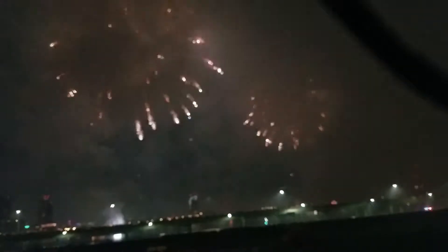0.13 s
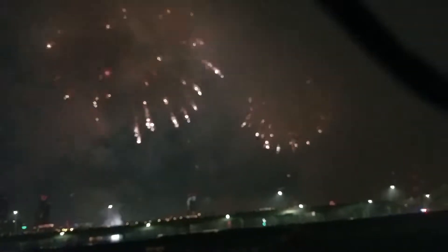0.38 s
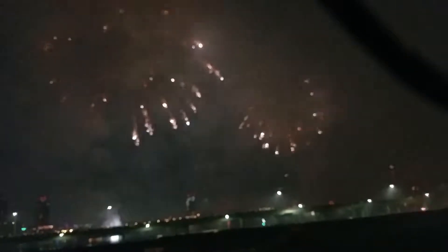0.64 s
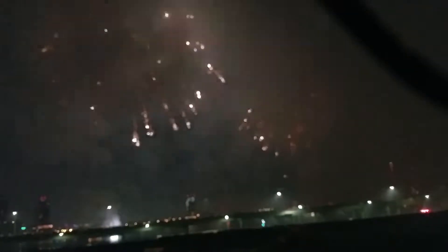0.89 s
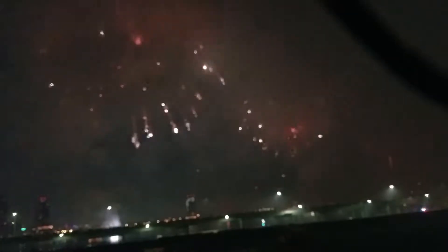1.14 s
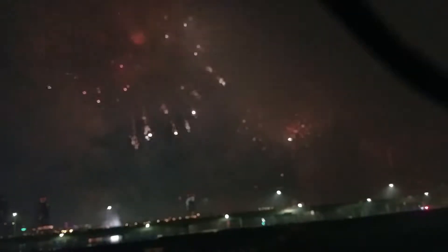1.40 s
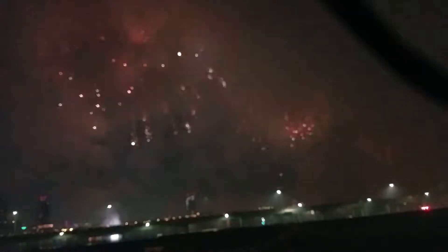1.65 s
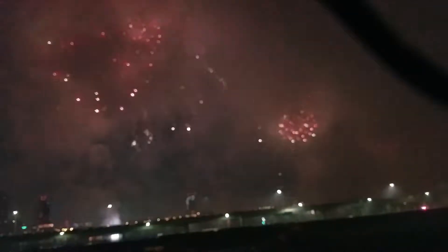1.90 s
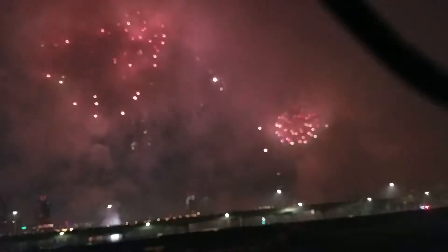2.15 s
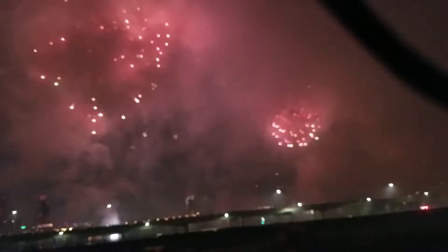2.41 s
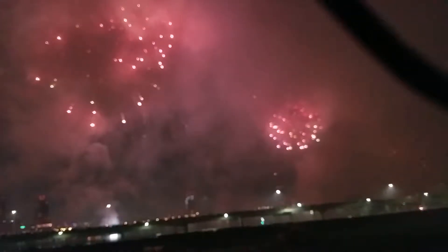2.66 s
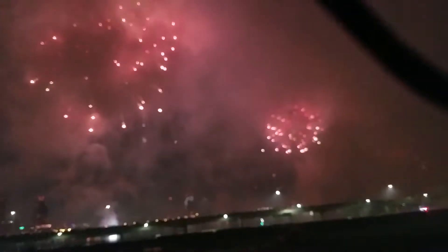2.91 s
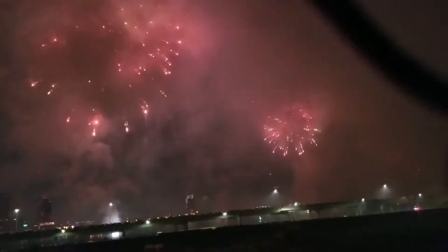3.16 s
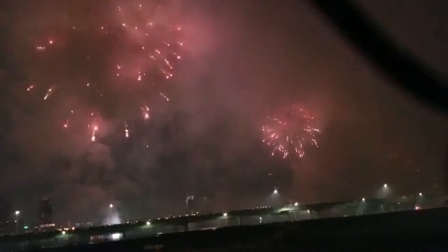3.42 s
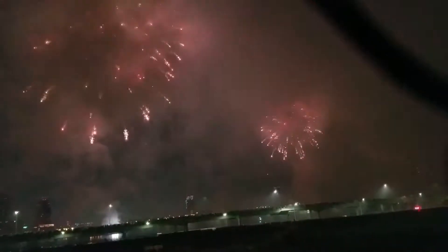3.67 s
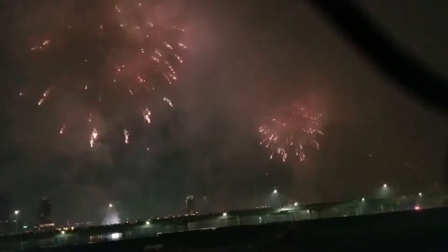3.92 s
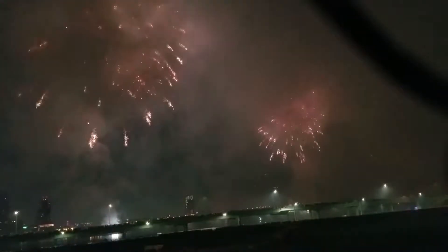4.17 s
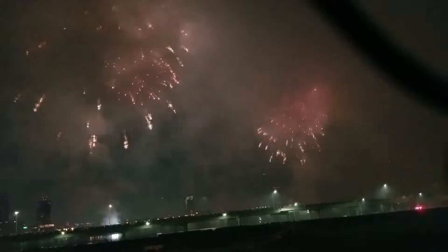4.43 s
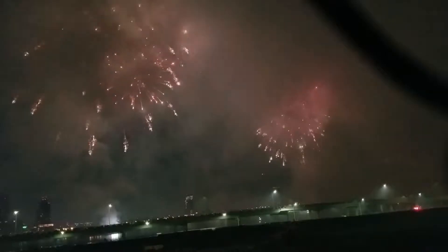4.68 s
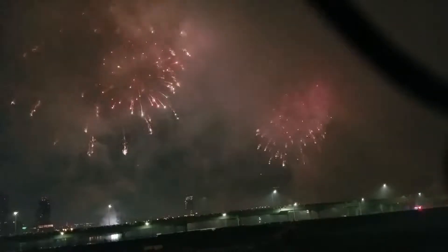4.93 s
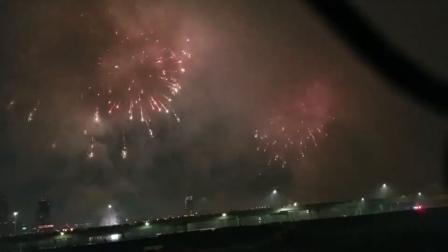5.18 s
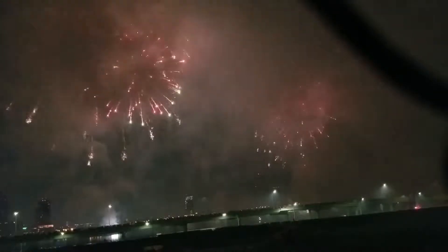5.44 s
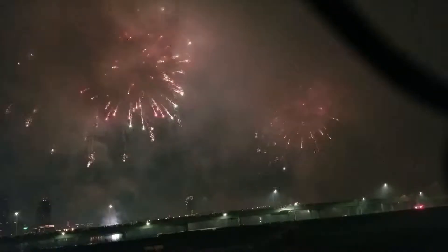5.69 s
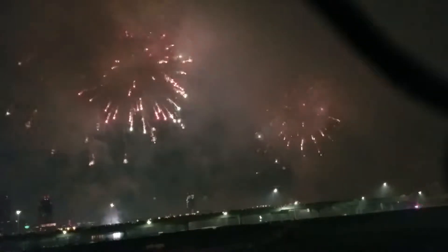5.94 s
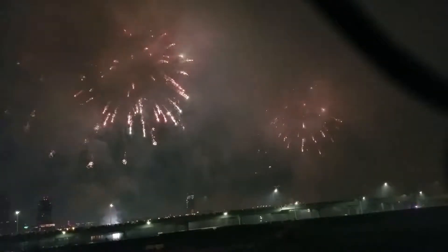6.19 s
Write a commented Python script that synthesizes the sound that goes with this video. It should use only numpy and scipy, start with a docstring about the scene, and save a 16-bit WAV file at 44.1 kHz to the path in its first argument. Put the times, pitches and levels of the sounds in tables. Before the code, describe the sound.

Aerial shells burst in an outdoor display, heard at a distance on a small handheld stereo microphone. Thumping reports with short bright cracks and rolling shore echoes come in irregular clusters, strongest near two, three and a half and five seconds. Between them, fizzing clouds of crackling stars rise and die over a wandering bass rumble and faint night noise; hard little clicks and rattles strike close to the microphone.

```python
"""Fireworks far off over water at night: crackling clouds of stars swell and fade over a lurching rumble.
Stars and rumble are countless small random bursts, coloured and spread over several bearings.
Each loud report is a blast wave, its mirror off the water, a bright crack and scattered shore echoes.
Sharp ticks and rattles ring two small microphone ports, mostly the left; slow thuds deepen the blasts."""
import sys
import numpy as np
from scipy import signal
from scipy.fft import rfft, irfft
from scipy.io import wavfile
from scipy.ndimage import uniform_filter1d

SR = 44100
rng = np.random.default_rng(int(sys.argv[2]) if len(sys.argv) > 2 else 0)


def digitize_waveform(pressure):
    """Quantize a signal to 16-bit integers and store it at the path in sys.argv[1].

    Rows of a 2-D input are taken as channels; values are limited to [-1, 1].
    """
    field = np.atleast_2d(pressure).T
    bounded = np.clip(field, -1, 1)
    quanta = np.round(bounded * 32767).astype(np.int16)
    wavfile.write(sys.argv[1], SR, quanta)


def voltage_ratio(level):
    """Linear amplitude factor for a level in decibels (scalar or array-like)."""
    return 10 ** (np.asarray(level, float) / 20)


N = 278712  # length of the scene in samples


def evened(x):
    """Scales to an rms (average strength) of 1."""
    return x / np.sqrt(np.mean(x ** 2) + 1e-20)


def read(points, hz):
    """Reads a table of (f/Hz, value) along log frequency."""
    f, value = np.transpose(points)
    return np.interp(np.log(hz + 1), np.log(f + 1), value)


def add(mix, s, sound):
    """Mixes a sound in at s seconds, cut off where the scene ends."""
    part = mix[:, round(s * SR):][:, :sound.shape[1]]
    part += sound[:, :part.shape[1]]


def coloured(x, points):
    """Filters with the given spectrum, with no sound ahead of its cause (minimum phase)."""
    log_gain = np.log(voltage_ratio(read(points, abs(np.fft.fftfreq(8192, 1 / SR)))))
    taps = np.fft.ifft(np.exp(np.conj(signal.hilbert(log_gain)))).real[:4096]
    return signal.oaconvolve(x, taps[None], axes=1)[:, :x.shape[1]]


def scattered(pair):
    """Makes two unrelated signals agree in the bass only, as sound from all around does at two ports."""
    # left-right likeness: f/Hz, likeness (0 to 1)
    likeness = [(60, 1), (300, 0.88), (700, 0.21), (1500, 0.015)]
    a, b = rfft(pair)
    same = np.clip(read(likeness, np.fft.rfftfreq(pair.shape[1], 1 / SR)), 0, 1)
    return irfft(np.array([a, same * a + np.sqrt(1 - same ** 2) * b]), pair.shape[1])


def patchy(x, depth_db):
    """Lets the level wander in patches about 430 Hz wide and 0.07 s long; the result has rms 1."""
    z = signal.stft(x, nperseg=512)[2]
    field = rng.standard_normal(z.shape[1:])
    field = uniform_filter1d(field, size=5, axis=0)  # along frequency
    field = uniform_filter1d(field, size=12, axis=1)  # along time
    varied = z * voltage_ratio(depth_db * evened(field))
    return evened(signal.istft(varied, nperseg=512)[1][:, :N])


def night():
    """Steady background noise of the night: coloured noise from all around."""
    # spectrum: f/Hz, level/dB
    spectrum = [(24, -28), (40, 5.5), (189, 0.5), (600, -1.5), (870, -11), (1020, -6.5), (1600, -7.5),
                (2000, -7.5), (2600, -16), (6820, -38), (16000, -35)]
    noise = scattered(rng.standard_normal((2, N)))
    return voltage_ratio(-36.5) * patchy(coloured(noise, spectrum), depth_db=1.3)


def pops(per_s, spread_db, colour, wet_db, bounce, patchy_db):
    """Countless small bursts from several bearings, each with a close bounce, plus a diffuse wash."""
    # where the sound comes from: left's lead/samples, level/dB
    bearings = [(8.5, -3.5), (2, -8), (13.5, -8.5), (-18, -6.5), (-5, -11.5)]
    happens = rng.random(N) < per_s / SR
    size = happens * voltage_ratio(spread_db * np.minimum(rng.exponential(1, N), 4))
    place = rng.integers(0, 4 * len(bearings), N)
    out = np.zeros((2, N))
    for k, (lead, db) in enumerate(4 * bearings):  # four bounce delays for each bearing
        train = voltage_ratio(db) * size * (place == k)
        train = train + bounce * np.roll(train, rng.integers(6, 70))
        out += [train, np.roll(train, round(lead))]
    wash = scattered(rng.standard_normal((2, N)))
    out = evened(out - out.mean()) + voltage_ratio(wet_db) * wash
    return patchy(coloured(out, colour), patchy_db)


def crackling_stars():
    """Clouds of crackling stars swell and fade, each with its own treble, over a few stray stars."""
    # spectrum: f/Hz, level/dB
    crackle = [(150, -47), (400, -2.5), (800, -7), (1400, -7.5), (2050, -10), (3000, -10), (4600, -19.5),
               (6600, -28.5), (16000, -56.5)]
    # clouds: peak t/s, peak level/dB, swell/s, fade/s, treble above 3 kHz/dB
    # (one swell time before the peak, or one fade time after it, the level is 17.1 dB down)
    clouds = [(.1, -32, 0.47, 0.92, -7), (.4, -23.5, 0.63, 0.5, 2.5), (.69, -23, 0.42, 0.047, 1),
              (1.73, -21, 0.41, 0.095, 0.5), (1.93, -31, 0.77, 0.18, -1.5), (2.63, -34, 0.16, 0.11, -1),
              (3.29, -25.5, 0.24, 0.092, -4.5), (3.5, -28, 0.6, 0.46, -9.5), (4.15, -35.5, 1, 0.33, -1),
              (4.502, -27, 0.23, 0.059, -1), (4.6, -27.5, 0.072, 0.45, 2), (5.98, -29.5, 0.54, 0.26, 2),
              (6.31, -26, 0.49, .2, -3)]
    t = np.arange(N) / SR
    peak, db, swell, fade, treble_db = np.transpose(clouds)[:, :, None]
    power = voltage_ratio(2 * db - 34.2 * ((t - peak) / np.where(t < peak, swell, fade)) ** 2)
    stray, stray_treble_db = voltage_ratio(2 * -39), 3.5  # power of the stray stars and their treble
    total = power.sum(0) + stray
    bright_db = ((power * treble_db).sum(0) + stray * stray_treble_db) / total  # louder clouds weigh more
    stars = pops(3500, 3.53, crackle, -2.1, bounce=0.48, patchy_db=1.4)
    dull = signal.filtfilt(*signal.butter(1, 3000, fs=SR), stars)
    stars = dull + voltage_ratio(bright_db) * (stars - dull)
    return np.sqrt(total) * stars


def far_rumble():
    """Farther shells: low bursts whose level follows a table and lurches at random."""
    # spectrum: f/Hz, level/dB
    low_colour = [(20, -5.5), (45, -8.5), (100, 0), (200, -3), (320, -5), (600, -14.5), (900, -32.5),
                  (2000, -48)]
    # level over time: t/s, level/dB
    roll = [(0, -23), (.32, -22.5), (.69, -25.5), (.77, -26.5), (1.16, -42.5), (1.34, -37), (1.64, -22),
            (1.78, -26), (1.81, -14.5), (1.9, -24.5), (1.97, -19.5), (2.03, -29.5), (2.41, -34.5),
            (2.52, -24.5), (2.66, -27.5), (2.94, -31), (3.08, -27.5), (3.29, -20.5), (3.44, -21.5),
            (3.5, -21.5), (3.58, -21.5), (3.68, -19.5), (3.82, -25), (3.98, -25.5), (4.1, -28.5),
            (4.34, -27.5), (4.44, -23), (4.52, -19), (4.55, -27.5), (4.66, -24.5), (4.85, -29), (5.03, -22),
            (5.09, -21), (5.22, -28.5), (5.6, -33), (5.76, -22), (5.86, -23.5), (5.92, -19.5), (6.2, -27.5),
            (6.32, -28.5)]
    lurch = uniform_filter1d(rng.standard_normal(N), 900)
    lurch = evened(uniform_filter1d(lurch, 900))
    level_db = np.interp(np.arange(N) / SR, *np.transpose(roll)) + 0.82 * lurch
    return voltage_ratio(level_db) * pops(800, 2.1, low_colour, 1.0, bounce=0.5, patchy_db=0.42)


def tick(db, pan_db, rattle_ms):
    """A tiny sharp tap with a small push, then loose taps that die away, all ringing the port."""
    t = np.arange(4000) / SR
    ring = np.sin(2 * np.pi * 8100 * t) * np.exp(-t / 0.00021)
    edge = 0.072 * np.sin(2 * np.pi * 14000 * t) * np.exp(-t / .0001)
    push = 0.046 * np.exp(-t / 0.0013) - .04 * np.exp(-t / 0.002)
    taps = 0.37 * rng.standard_normal((2, 4000)) * np.exp(-t * 1000 / rattle_ms)
    dull_tap = signal.windows.tukey(60, .6) * (ring + 0.25 * edge)[:60]  # less edge than the first tap
    loose = signal.oaconvolve(taps, dull_tap[None], axes=1)[:, :4000]
    return voltage_ratio(db + np.array([[0], [-pan_db]])) * (ring + edge + push + loose)


def add_ticks(mix):
    """Adds ticks and blast-shaken rattles right at the ports."""
    # ticks: t/s, left level/dB, left minus right/dB, rattle decay/ms
    ticks = [(0.4076, -16, 8, 1), (0.4518, -9, 10, 2.3), (0.7057, -3, 10, 6.2), (0.965, -5.5, 40, 0.12),
             (1.7914, -13, 2, 39), (1.7975, 1.5, -1, 1.3), (1.922, -17, 14, 2), (1.929, -21, 9, 3.5),
             (1.939, -13.5, 15, 2.4), (1.979, -23, 5, 11), (2.028, -9.5, 24, 0.22), (2.4445, -16, 6, 22),
             (2.927, -19.5, 9, 3), (2.951, -14, 11, 1.4), (2.883, -38, -3, 3), (3.104, -31, 0, 3),
             (3.335, 2, 32, 0.12), (4.2979, -11, 21, .2), (4.521, -3.5, 7, 4.2), (4.526, 0.5, 9, 2.4),
             (4.5461, 0, 8, 3.1), (4.641, -20.5, 1, 4), (4.925, -1, 34, .2), (4.976, -14.5, 2.5, 54),
             (5.178, -12, 16, 1.7), (5.4937, -8, 30, 0.18)]
    for s, *row in ticks:
        add(mix, s, tick(*row))


def blast(ms, soft):
    """A steep pressure jump falls through zero to suction and eases back, rounded by the air."""
    u = np.arange(1024) / SR * 1000 / ms  # time in blast lengths
    wave = (1 - 1.96 * u) * np.clip((1.15 - u) / 0.49, 0, 1)
    return signal.lfilter(*signal.butter(2, soft * 1000 / ms, fs=SR), wave)


def report(db, ms, mirror_ms, mirror_db, crack_db, edge_hz, lead):
    """Blast and mirror reach the nearer port first; echoes and a bright crack trail behind."""
    # crack spectrum: f/Hz, level/dB
    crack_colour = [(150, -5), (500, 18.5), (1000, 13.5), (2000, 9.5), (4000, 5.5), (8000, -7),
                    (16000, -35)]
    size, mirror = 16384, round(mirror_ms * SR / 1000)
    t = np.arange(size) / SR
    path = np.zeros((2, size))  # one click a port, at its arrival time
    path[[0, 1], [max(-round(lead), 0), max(round(lead), 0)]] = 1
    taps, hiss, walls = rng.standard_normal((3, 2, size))

    # nearby walls throw back a short mid-range knock
    knock = voltage_ratio(6 + 0.6 * crack_db) * scattered(walls) * np.exp(-t / 0.0048)
    knock = signal.lfilter(*signal.butter(2, (450, 1500), "band", fs=SR), knock)

    # near walls die fast, the far shore slowly
    dying = voltage_ratio(-60 * t / 0.33) + voltage_ratio(-23.0 - 60 * t / 0.64)

    # the steep edge of the shock; from the right it is louder in the right port
    shadow_db = 0.21 * min(lead, 0)  # dB per sample of lead
    front = 19 * np.roll(path, 4, axis=1) * voltage_ratio([[shadow_db], [-shadow_db]])
    front = front + 1.87 * hiss * np.exp(-t / 0.0026)
    mirrored_front = 0.68 * voltage_ratio(mirror_db) * np.roll(front, mirror, axis=1)
    crack_tail = 0.75 * dying * hiss * voltage_ratio(-60 * t / 1.3)
    crack = voltage_ratio(crack_db) * (front + mirrored_front + crack_tail)
    air = signal.butter(2, edge_hz, fs=SR)
    crack = signal.lfilter(*air, signal.lfilter(*air, crack))

    path += 0.12 * np.roll(path, round(1.2 * ms * SR / 1000), axis=1)  # bounce off the ground nearby
    path = voltage_ratio(db) * path
    duller = blast(1.26 * ms, soft=2.03)
    mirrored = voltage_ratio(mirror_db) * signal.oaconvolve(np.roll(path, mirror, axis=1), duller[None], axes=1)

    shore_db = -13 + 0.44 * db + 0.18 * crack_db  # shore echoes grow with blast and crack
    echoes = voltage_ratio(shore_db) * scattered(taps) / np.sqrt(ms * SR / 2000)
    echoes = echoes * dying * np.clip(t / 0.0041, 0, 1)
    long_blast = blast(3.8 * ms, soft=1.4)  # long paths keep the bass
    boom = 0.37 * signal.oaconvolve(echoes, long_blast[None], axes=1)
    direct = signal.oaconvolve(path + echoes, blast(ms, soft=1.98)[None], axes=1)
    return (direct + mirrored + boom)[:, :size] + coloured(crack, crack_colour) + knock


def add_reports(mix):
    """Adds the shell bursts, each a blast with its mirror, crack and echoes."""
    # reports: t/s, blast level/dB, blast length/ms, mirror delay/ms, mirror level/dB, crack level/dB,
    # treble edge of the crack f/Hz (lower from farther off), left's lead/samples
    reports = [(0.7045, -4, 2.8, 3.1, 1, -19.5, 10000, 9), (0.711, -11, 2, 7.8, -8, -32, 6000, 6),
               (0.7302, -6, 2, 5.1, 2.5, -49, 4500, 4), (0.7429, -5.5, 2.1, 6.1, 3, -42, 4500, 5),
               (0.77, -9, 2.1, 5.5, -0.5, -47, 2903, 7), (0.878, -14.5, 4.8, 3.6, -3.5, -41, 4440, 8),
               (1.7918, 7, 2.98, 5.33, 0, -24, 12000, 6.5), (1.9138, -6, 2.3, 4.9, -4, -47, 3500, 3),
               (1.817, -19, 2.6, 5.5, -6, -29.5, 9000, -18), (1.9494, -4, 1.58, 2.5, -7, -32.5, 4000, -3),
               (2.4439, 0, 2.36, 5.8, -6, -30, 9000, 7.5), (2.521, -7, 3.8, 7.7, -8, -55, 5000, 8),
               (2.782, -13, 3, 4.3, -19, -49, 4000, 15), (2.968, -19.5, 2.3, 6.7, 1.5, -64, 3600, 8),
               (3.3743, 7, 2.74, 13, -6, -31.5, 8800, 0.5), (3.4097, -7, 2.4, 2.9, 4, -35.5, 6000, -8),
               (3.5076, -3.5, 2.04, 3, 2, -35, 5000, -18), (3.5264, -10, 2.1, 2.6, 3.5, -37.5, 8000, 10),
               (3.5941, 6, 3.15, 14.3, -7, -53, 4540, 4), (3.677, -14, 3.4, 7.2, 1, -34, 9000, 9),
               (3.7291, -3.5, 1.75, 2.8, -8, -32, 10900, -14.5), (3.7485, -11.5, 2.7, 2.4, 8, -49, 8000, 9),
               (3.8467, -4, 2.66, 9.8, 2, -44, 4000, -6), (3.981, -14.5, 2.7, 5.5, 0, -43, 5470, 4),
               (4.209, -23, 2.1, 4.2, 0, -40, 6500, 8), (4.417, -6, 2.6, 5.5, -8, -59, 4000, -16),
               (4.563, -18, 1.6, 5, 5, -38, 6500, -11), (4.771, -10.5, 1.6, 4.8, -1, -39, 6000, 10),
               (4.864, -2.5, 3.25, 9.5, 1.5, -36, 3500, -8), (4.975, 6, 2.67, 5.1, -7, -24.5, 11000, 8.5),
               (4.9923, -11, 3.1, 5.5, 4, -39, 7500, 2), (5.0071, -9, 2.6, 4.8, -1, -33, 8000, 5),
               (5.0199, -2.5, 4.6, 8.5, -8, -37, 7500, 7), (5.0964, -5, 2.1, 3.1, -5, -32, 2500, 9),
               (5.112, -10, 2.2, 2.7, 1, -34.5, 2500, 12.5), (5.135, -9.5, 2.3, 5.6, 1, -34, 5000, -16),
               (5.1594, -7.5, 1.95, 2.83, 3, -31, 2500, 11), (5.1646, -15, 1.43, 2.2, -6, -30, 7900, 4.5),
               (5.617, -11.5, 4.2, 15.4, -15, -53, 4500, -18), (5.6297, -13, 1.5, 6.2, -8, -41, 4000, -12),
               (5.6772, 0, 3.1, 15.5, -1.5, -34, 5540, 5), (5.8067, -2, 2.06, 21.4, 0, -32.5, 4500, -15),
               (5.845, -5.5, 4.5, 7.6, 2, -45, 5000, 8), (5.872, -13, 2, 13, -6, -46, 5000, 10),
               (5.9385, -9.5, 2.85, 8.3, 4.5, -48, 4000, -9),
               (6.2315, 0.5, 1.72, 4.95, -4.5, -28.5, 4000, 5)]
    for s, *row in reports:
        add(mix, s, report(*row))


def add_thuds(mix):
    """Adds slow, deep thuds: long blast waves, the same in both ports."""
    # thuds: t/s, level/dB, length/ms
    thuds = [(0.715, -4.5, 14), (1.8121, 1.5, 4.7), (1.965, -11, 18), (3.4176, -3, 18.3), (3.514, -5, 8.2),
             (3.7348, -5, 4.8), (4.51, -7, 5.4), (4.524, -6, 4.4), (5.031, -2, 7.6), (5.1062, -3.5, 12),
             (5.171, -5, 10.3), (5.699, -4.5, 6.5), (5.8135, 0.5, 7.7), (6.246, -1, 10.3)]
    for s, db, ms in thuds:
        add(mix, s, voltage_ratio(db) * np.tile(blast(ms, soft=1.6), (2, 1)))


def through_ports(mix):
    """The cavity of each port resonates near 8 kHz, and the two ports differ a little in tone."""
    # port difference: f/Hz, left minus right/dB
    ports = [(60, 1.8), (300, -0.5), (1300, 0.5), (4400, -4), (8000, 2), (15000, 8)]
    hz = np.fft.rfftfreq(N, 1 / SR)
    resonance = 1 + voltage_ratio(8) / (1 + 2j * (hz - 8260) / 950)  # centre and width in Hz
    balance = voltage_ratio(np.outer([.5, -.5], read(ports, hz)))
    return irfft(rfft(mix) * resonance * balance, N)


def through_microphone(mix):
    """The microphone colours the sound and loses the highest treble."""
    # response: f/Hz, level/dB
    response = [(700, 1), (860, 0.5), (980, 2.5), (1400, -1), (1950, 2), (2500, -1), (3200, -1),
                (4100, 0.1), (4900, 1.5), (6800, 1), (9000, 1), (10200, -10), (12000, -9), (15500, -13),
                (16800, -25), (17200, -65)]
    return coloured(mix, response)


def scene():
    """All that the two ports pick up; the ticks arise at the ports, so they join last."""
    mix = crackling_stars() + far_rumble() + night()
    add_reports(mix)
    add_thuds(mix)
    mix = through_microphone(through_ports(mix))
    add_ticks(mix)
    return mix


def low_pass(x):
    """Removes everything above the highest recorded frequency."""
    return signal.sosfilt(signal.butter(12, 16820, fs=SR, output="sos"), x)


def record(dry):
    """Cuts the bass, clips the loudest peaks hard and limits the treble."""
    cut = signal.lfilter(*signal.butter(2, 45, "high", fs=SR), dry)
    clipped = np.clip(cut, -.97, .97)
    finished = signal.oaconvolve(clipped, signal.firwin(255, 16600, fs=SR)[None], "same")
    return low_pass(finished)


dry = scene()
out = record(dry)
digitize_waveform(out)
```